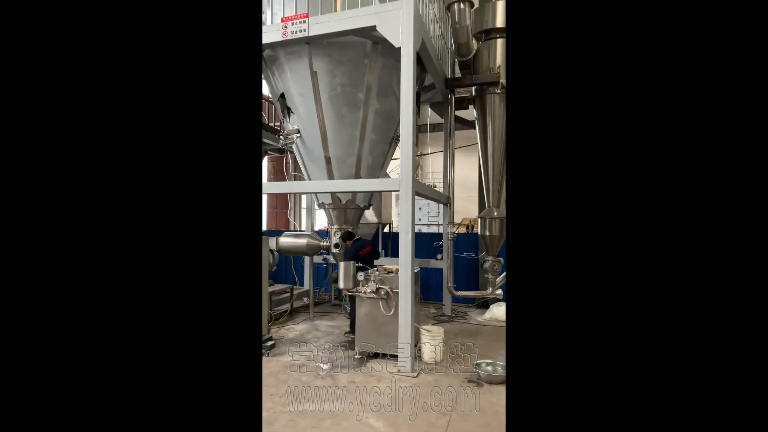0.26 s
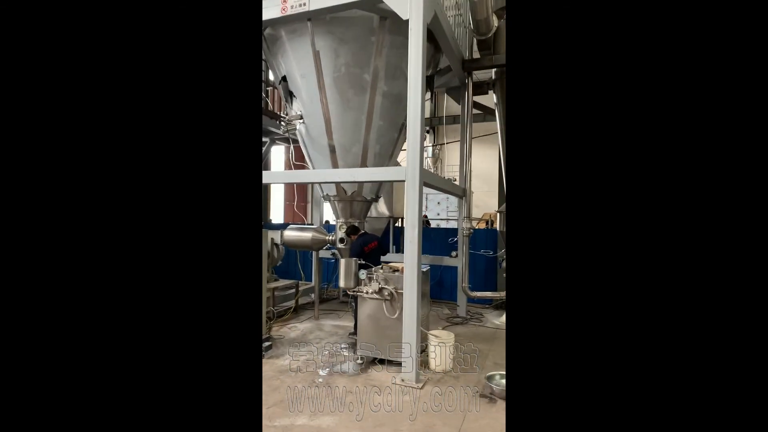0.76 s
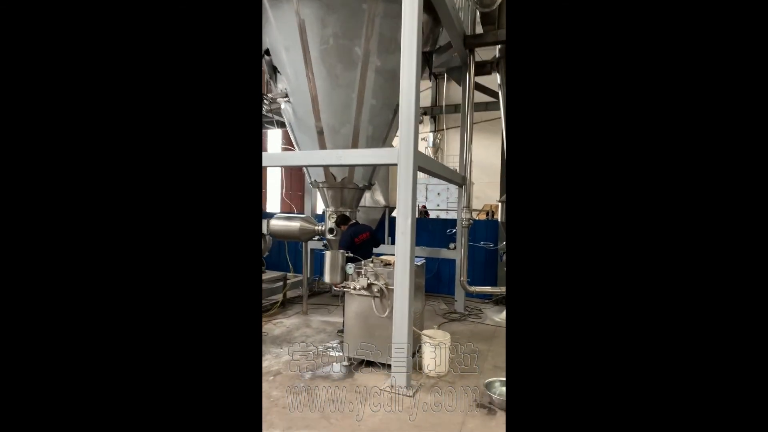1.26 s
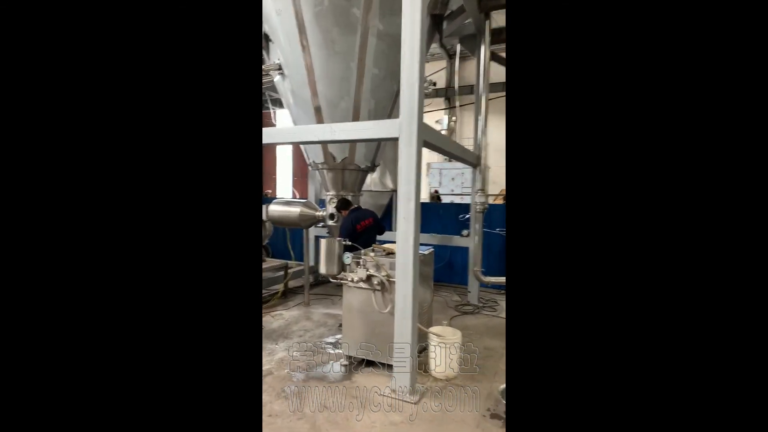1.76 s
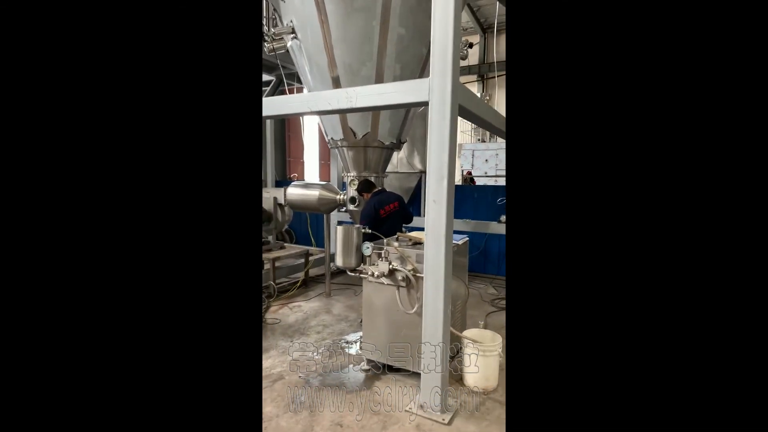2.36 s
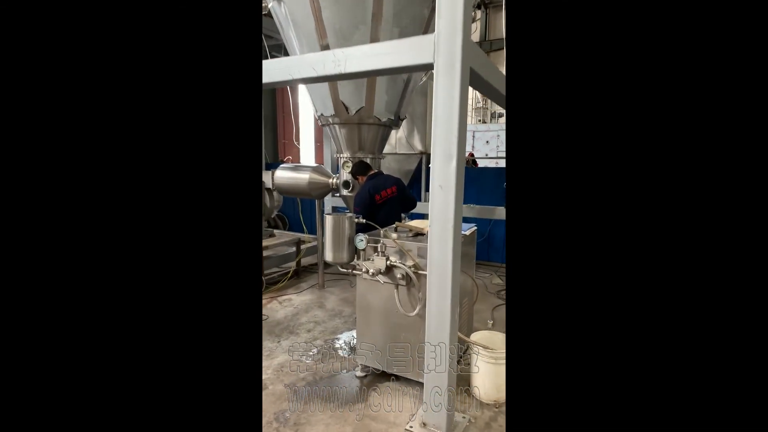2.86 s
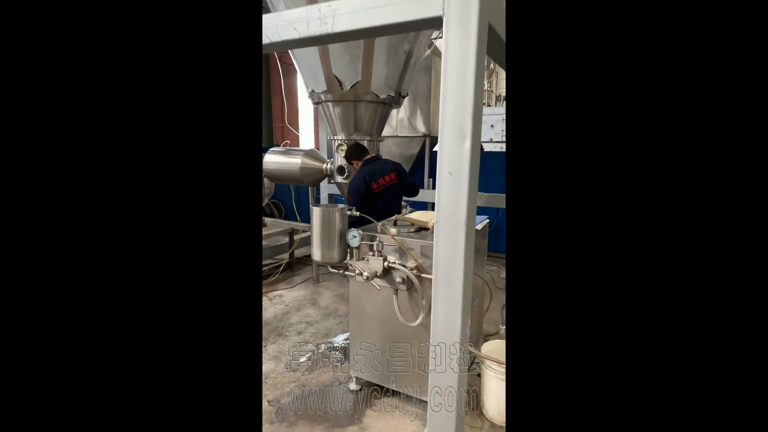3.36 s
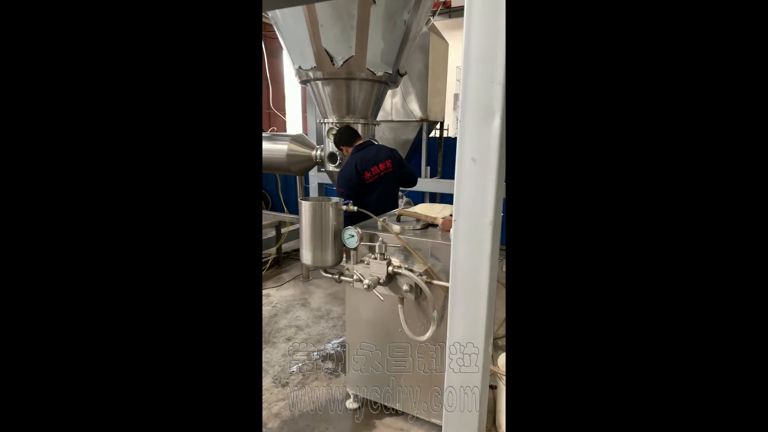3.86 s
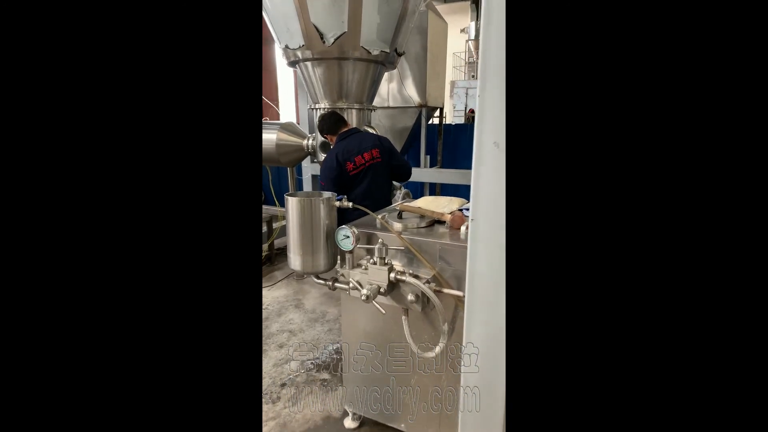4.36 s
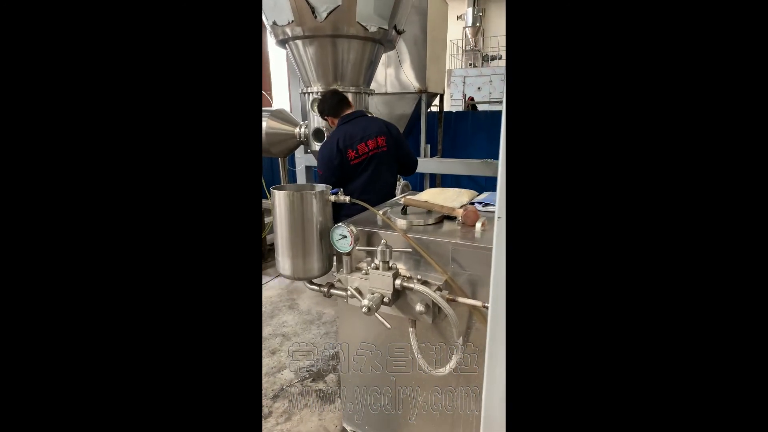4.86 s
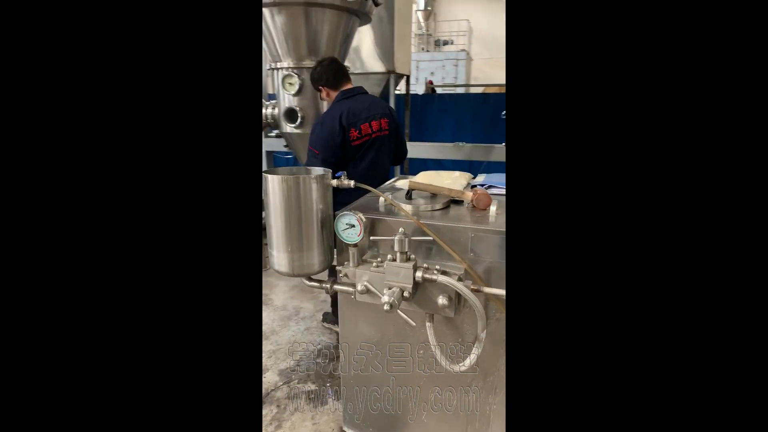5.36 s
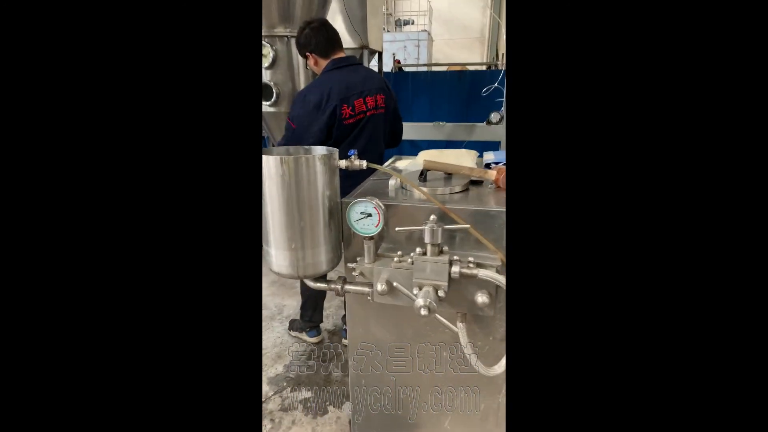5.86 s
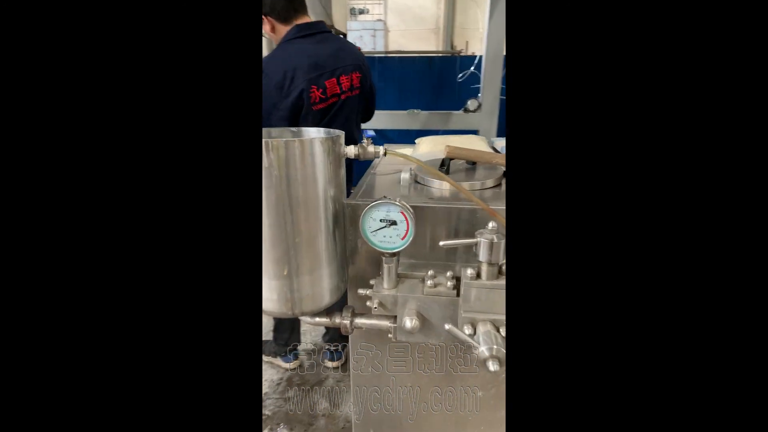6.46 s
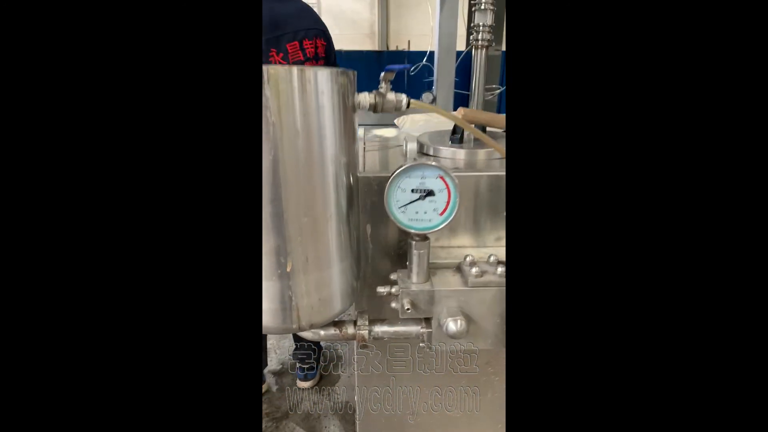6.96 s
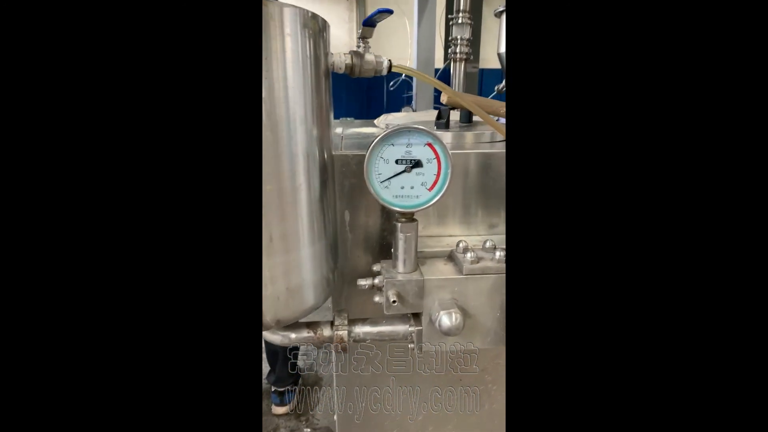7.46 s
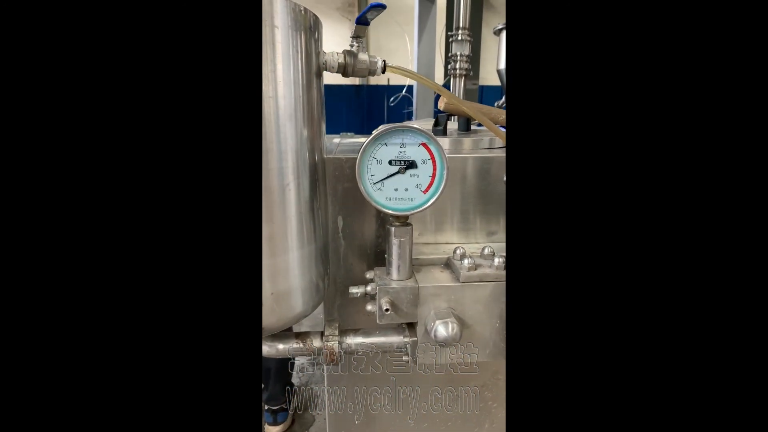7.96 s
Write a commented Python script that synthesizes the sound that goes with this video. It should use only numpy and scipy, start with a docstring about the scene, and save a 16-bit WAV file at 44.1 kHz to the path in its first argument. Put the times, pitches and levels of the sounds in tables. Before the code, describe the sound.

A phone carried toward machinery captures continuous rumble, broadband air rush and beating electrical whine. A thin air leak builds, then one hard metallic bang with sheet-steel clatter overloads the microphone and rings through the hall. Compressed air blasts out and dies away with a tiny squeak and rising whistle, then a dull double knock. The drone returns gradually, the whine getting nearer, with sparse sharp ticks, more frequent in the last three seconds.

```python
"""A spray dryer drones in a factory hall: filtered noise for fans, ducts and nozzle; beating tones for the motor.
A charged air line leaks thinly and small ticks (short noise rings) recur. At 1.86 s a pneumatic hammer strikes
the steel hopper (decaying modes and clatter), vents a noise blast from 2.06 s, squeaks, whistles, and drops back
near 3 s. The phone's limiter ducks the drone under the blow; the hall's echo swells as it lets go.
The drone regains its full level only seconds later, and the motor whine grows as one walks up to it."""
import sys
import numpy as np
from scipy import signal
from scipy.fft import rfft, irfft, next_fast_len
from scipy.io import wavfile
from scipy.ndimage import uniform_filter1d, minimum_filter1d

SR = 44100
rng = np.random.default_rng(int(sys.argv[2]) if len(sys.argv) > 2 else 0)


def unload_audio(sound):
    """Save the sound as a 16-bit wav file, at the path given as the first command line argument."""
    columns = np.transpose(np.atleast_2d(sound))
    # keep every value between -1 and 1, then stretch to whole-number steps
    steps = np.round(np.clip(columns, -1, 1) * 32767)
    wavfile.write(sys.argv[1], SR, steps.astype(np.int16))


N = 362502
TIME = np.arange(N) / SR
FREQ = np.fft.rfftfreq(2 * next_fast_len(N // 2 + 1), 1 / SR)

# hopper modes: (frequency [Hz], level if anvil is struck [dB], level if seat is struck [dB], t60 [s])
HOPPER_MODES = [(332.2, -11.5, 2.5, 0.19), (390, 2.5, -1, 0.048), (470, -2, 0.5, 0.058),
                (551, -32.5, -25, 2.3), (655, -9, -0.5, 0.1), (748, -25, -21, 0.86),
                (811, -1.5, -19, 0.096), (850, -19.5, -31, 0.66), (1032, -14.5, -17, 0.66),
                (1194, -8, -30, 0.17), (1274, -17, -20, 0.32), (1324, -5, -31, 0.14),
                (1473, -15, -14, 0.18), (1488, -20, -20, 0.4), (1620, -22, -27, 0.3),
                (1683, -20, -25, 0.32), (1750, -26, -19, 0.3), (2124, -24, -33, 0.43),
                (2506, -15, -26, 0.15), (2750, -25, -35, 0.18)]
# sheet-steel clatter spectrum: (frequency [Hz], relative density [dB/Hz])
CLATTER_SPECTRUM = [(60, -34), (200, 1), (370, 10), (600, -12.5), (1400, -2.5), (2600, -4), (4200, -9.5),
                    (5300, -6.5), (6400, -3), (8000, -12.5), (11200, 1), (12500, -14), (16000, -23)]
# strike, jolt loose, drop back, bounce: (time [s], ring [dB], clatter [dB], clatter t60 [s],
# contact low-pass corner [Hz], place struck [0 anvil - 1 seat])
BLOWS = [(1.857, 8.5, 5, 0.13, 23700, 0.041), (2.09, -19, -8, 0.49, 2600, 0.3),
         (2.983, -12.5, -12, 0.17, 1700, 1), (3.056, -28, -21, 0.12, 2000, 1)]
# air let out of the hammer: (time [s], level [dB], rise [s], t60 [s], low edge [Hz], high edge [Hz])
VENTS = [(1.822, -12, 0.0044, 0.042, 8000, 14000), (1.843, -7, 0.012, .04, 2200, 3600),
         (2.057, 6.5, 0.01, 0.18, 9500, 22000), (2.074, 8, 0.0167, 0.27, 282, 22000),
         (2.83, -13.5, 0.015, 0.37, 4800, 22000)]
# vented-air spectrum before band limits: (frequency [Hz], relative density [dB/Hz])
VENT_SPECTRUM = [(60, 23.5), (200, 14), (500, 6), (1400, 4.5), (2800, -0.2), (4500, -1), (7000, -2.5),
                 (11000, -2), (16000, -6)]
# whistle of the emptying air line: (time [s], frequency [Hz], level [dB])
WHISTLE_TRACK = [(2.36, 1074, -49), (2.47, 1087, -33), (2.8, 1114, -36), (2.88, 1122, -50)]
# low moan of the emptying air line: (time [s], frequency [Hz], level [dB])
MOAN_TRACK = [(2.55, 221.3, -50), (2.73, 234, -32.5), (2.86, 250, -53), (2.98, 251, -43)]
# valve squeak as the pressure falls: (time [s], level [dB])
SQUEAK_LEVEL = [(2.38, -76), (2.43, -39), (2.48, -24), (2.56, -79)]
# squeak partials: (frequency [Hz], relative level [dB])
SQUEAK_PARTIALS = [(4660, -17), (9320, -9), (11650, -14), (13980, -14)]

# inverter switching tones and sidebands, each with one swell or dip:
# (frequency [Hz], relative level [dB], swell time [s], swell gain [dB], half width [s])
SWITCHING_TONES = [(5636, -14, 7.5, 2, 1), (5733, -9, 4.6, 4, 0.7), (5883, 1, 4, 2.5, 1),
                   (5977, 0, 6.4, 3, 1.2), (6025, 1, 0.25, 8, 0.3), (6078, -7, 4.5, -3, 1.5),
                   (6125, -1.5, 7.9, 4, 0.7), (6175, -6, 8, 2, 0.5), (6272, -14, 5.5, 4, 0.9),
                   (6320, -14, 6, 3, 1), (6465, -10, 6.1, 4.5, 1.2), (9946, -26, 7.6, 11, 1.2),
                   (11854, -21, 7.8, 5, 1)]
# motor casing rung by the switching: (frequency [Hz], relative density [dB/Hz])
CASING_SPECTRUM = [(5000, -17.5), (5700, 4), (6030, 3), (6350, 3), (7200, -11.5), (9600, -61), (9930, -1),
                   (10300, -36), (11500, -30), (11900, -9), (12500, -41)]
# whine swells: (time [s], gain [dB], half width [s])
WHINE_SWELLS = [(.15, -2, 0.2), (2.7, -2, 0.69), (3.5, 1.5, 0.22), (5.4, 2.5, 0.22), (7.08, -2.5, 0.09),
                (7.3, 3, 0.1), (7.63, -2, .17)]
# far from the motor its tones sink into the casing ring: (time [s], gain [dB], half width [s])
TONE_DIPS = [(1.0, -1, 1.4)]
CASING_SWELLS = [(0.9, 2.5, 1.2)]
STRIDE_S, STRIDE_CREST_S, STRIDE_DB, WALK_ENDS_S = 0.827, 4.57, 1.3, 6.47

# steady noise spectra of fans, ducts, nozzle: (frequency [Hz], relative density [dB/Hz])
RUMBLE_SPECTRUM = [(20, -27), (36, -18), (52, -3.5), (72, 3.5), (120, 0.5), (145, -5), (170, 0), (235, -2),
                   (320, -2), (350, -5), (440, -5.5), (500, -19), (800, -58)]
DUCT_SPECTRUM = [(250, -7), (480, 3), (660, 2), (850, 0.5), (1050, 0), (1500, -4.5), (2050, -5),
                 (2500, -10), (2900, -6.5), (3700, -6), (5000, -15.5), (8000, -12.5), (16000, -136)]
NOZZLE_SPECTRUM = [(2000, -20), (3000, 4), (5100, -1.5), (5700, 14), (6500, 11.5), (7500, -13), (9300, -6),
                   (11000, 3.5), (11600, 0.5), (12100, 9), (12700, -2), (14500, -1.5), (15600, -0.5)]
# shaft and casing hums: (frequency [Hz], level re rumble [dB])
HUMS = [(70, -14), (124, -11.5), (161, -13), (301.5, -10.5), (372, -11.5), (647, -20.5), (662, -18.5),
        (684, -23)]
# swells and dips of fans and ducts: (time [s], gain [dB], half width [s])
RUMBLE_SWELLS = [(.3, 0, 0.26), (7.15, -1.1, 0.29), (7.92, 2.5, 0.052)]
LOWER_FAN_SWELLS = [(1.6, 9, 0.33), (3.3, -20, 0.18), (5, 7, 0.73), (7.7, 9, 0.48)]
UPPER_FAN_SWELLS = [(.35, 6.1, 0.11), (1.5, 11.3, 0.16)]
DUCT_SWELLS = [(.15, -1, 0.13), (7.2, -2, 0.13), (7.8, 1.5, 0.15)]
LOWER_FAN_HZ, UPPER_FAN_HZ = 390.7, 421.4

# leak of the charged air line until the hammer fires: (time [s], level [dB])
LEAK_LEVEL = [(0, -54), (1.0, -38), (1.84, -40.5), (1.9, -90)]
# leak spectrum: (frequency [Hz], relative density [dB/Hz])
LEAK_SPECTRUM = [(1800, 1.5), (3600, 7.5), (4800, -5), (6050, 4), (7200, -7), (11600, -33), (12130, 4),
                 (12500, -12), (15300, -12), (15700, 6), (16000, -10)]
# small ticks: (time [s], level [dB], ring frequency [Hz])
TICKS = [(0.329, -35, 9850), (1.699, -33, 10000), (2.984, -28, 10500), (4.4344, -35, 9950),
         (5.127, -24.5, 9800), (5.8153, -27, 10500), (6.0332, -34, 11200), (6.2622, -35, 12000),
         (6.3784, -35, 11800), (6.5026, -25.5, 11600), (6.7221, -29, 11400), (6.9491, -37, 11400),
         (7.0678, -35, 9850), (7.193, -17, 10700), (7.4135, -31, 11800), (7.637, -32, 11100),
         (7.88, -22, 9700)]
# hall decay: (frequency [Hz], t60 [s])
HALL_DECAY = [(60, 9.8), (250, 1.9), (1000, 2.13), (2000, 1.82), (4000, 1.38), (8000, 0.7), (16000, 0.041)]
# microphone ports: (frequency [Hz], left lead [rad], diffuse share [dB], left minus right [dB])
PORTS = [(90, .03, -36, 0), (200, .2, -24, 0), (390, .48, -15, -1.1), (750, .5, -12, -1.3),
         (1550, .42, -12, -.3), (2500, 1.75, -7, -.3), (3500, 1.6, -10, 0), (4750, 3.14, -21, 0),
         (6000, 4.95, -14, 0), (6900, 6.28, -14, 0), (8900, 9.42, -21, 0), (11050, 12.57, -12, 0),
         (13100, 15.71, -22, 0), (15200, 18.85, -13, 0)]
TOP_HZ = 15750


def undb(db):
    """Decibels to gain."""
    return 10 ** (np.asarray(db) / 20)


def unit(x):
    """Scale to rms 1."""
    return x / np.sqrt(np.mean(x ** 2))


def over_time(rows):
    """Columns of a time table, interpolated at every sample."""
    time_s, *columns = np.transpose(rows)
    return [np.interp(TIME, time_s, c) for c in columns]


def over_freq(rows):
    """Columns of a frequency table, interpolated over log frequency."""
    hz, *columns = np.transpose(rows)
    return [np.interp(np.log(FREQ + 1), np.log(hz), c) for c in columns]


def shape(x, gain):
    """Filter by a gain per frequency bin."""
    return irfft(rfft(x, 2 * (len(FREQ) - 1)) * gain)[:N]


def noise(spectrum):
    """Coloured noise, rms 1."""
    return unit(shape(rng.standard_normal(N), undb(over_freq(spectrum)[0])))


def drift(rate_hz):
    """Random low-pass modulation without DC, rms 1."""
    return unit(shape(rng.standard_normal(N), np.exp(-(FREQ / rate_hz) ** 2) * (FREQ > 0)))


def grain(depth_db, rate_hz):
    """Quick, uneven flutter of strength, rms 1."""
    return unit(undb(depth_db * drift(rate_hz)))


def fade(start_s, t60_s, rise_s):
    """Linear rise, then exponential decay."""
    envelope = np.zeros(N)
    sounding = slice(int(start_s * SR), int((start_s + rise_s + 2 * t60_s) * SR))
    age_s = TIME[sounding] - start_s
    decay = np.exp(-np.log(1000) * np.maximum(age_s - rise_s, 0) / t60_s)
    envelope[sounding] = np.clip(age_s / rise_s, 0, 1) * decay
    return envelope


def tone(hz, scatter, rate_hz):
    """Held tone plus randomly changing reflections that add and cancel, rms 1."""
    knots_s = np.arange(0, N / SR + 1, 1 / rate_hz)
    echo = rng.standard_normal((800, 2))[:len(knots_s)]
    angle = 2 * np.pi * (np.cumsum(hz * np.ones(N)) / SR + rng.random())
    in_phase, quadrature = (scatter * np.interp(TIME, knots_s, part) for part in echo.T)
    return unit((1 + in_phase) * np.cos(angle) + quadrature * np.sin(angle))


def along_walk(start_db, db_per_s, swells=()):
    """Level of a steady source [dB]: linear drift plus bell-shaped swells."""
    bells_db = sum(db * np.exp(-((TIME - s) / width_s) ** 2) for s, db, width_s in swells)
    return start_db + db_per_s * TIME + bells_db


def hammer(spread_s=0.0084, clatter_rise_s=0.006):
    """Blows ring hopper modes and clatter; the place struck sets the mode levels."""
    out, age_s = np.zeros(N), TIME[:int(2 * SR)]
    for start_s, ring_db, clatter_db, clatter_t60_s, corner_hz, seat in BLOWS:
        ring = np.zeros(len(age_s))
        for hz, anvil_db, seat_db, t60_s in HOPPER_MODES:
            mode_db = anvil_db + seat * (seat_db - anvil_db) - 60 * age_s / t60_s
            ring += undb(mode_db) * np.sin(2 * np.pi * (hz * age_s + rng.random()))
        first = int(start_s * SR)
        # the blow takes milliseconds to spread over the shell
        out[first:first + len(age_s)] += undb(ring_db) * ring * np.minimum(age_s / spread_s, 1)
        contact = 1 / np.hypot(1, (FREQ / corner_hz) ** 2)
        clatter = shape(noise(CLATTER_SPECTRUM), contact) * grain(depth_db=2.5, rate_hz=180)
        out += undb(clatter_db) * clatter * fade(start_s, clatter_t60_s, clatter_rise_s)
    return out


def vents():
    """The valve spits as it opens, then dumps air as rough band-limited noise."""
    out = np.zeros(N)
    for start_s, db, rise_s, t60_s, low_hz, high_hz in VENTS:
        band = FREQ ** 2 / (FREQ ** 2 + low_hz ** 2) / np.hypot(1, (FREQ / high_hz) ** 2)
        air = shape(noise(VENT_SPECTRUM), band) * grain(depth_db=2.0, rate_hz=195)
        out += undb(db) * fade(start_s, t60_s, rise_s) * air
    return out


def whistle(track, waver, flutter_db):
    """Air-driven rising tone of the emptying line, wavering in pitch and strength."""
    hz, db = over_time(track)
    angle = 2 * np.pi * np.cumsum(hz * (1 + waver * drift(29.0))) / SR
    blowing = (TIME > track[0][0]) & (TIME < track[-1][0])
    return blowing * undb(db + flutter_db * drift(15)) * unit(np.sin(angle))


def squeak():
    """Short valve squeak: partials sharing one wavering pitch."""
    db, = over_time(SQUEAK_LEVEL)
    clock_s = np.cumsum(1 + 0.0027 * drift(60)) / SR
    partials = sum(undb(tone_db) * np.sin(2 * np.pi * hz * clock_s) for hz, tone_db in SQUEAK_PARTIALS)
    sounding = db > SQUEAK_LEVEL[0][1] + 3
    return undb(db + 1.5 * drift(40)) * sounding * partials


def motor():
    """Switching tones beat over casing-ring noise; walking sways level and doubles pitch wander."""
    walking = np.clip((WALK_ENDS_S - TIME) / 0.1, 0, 1)
    sway_db = STRIDE_DB * np.cos(2 * np.pi * (TIME - STRIDE_CREST_S) / STRIDE_S) * walking
    whine_db = along_walk(-44, 0.88, WHINE_SWELLS) + sway_db
    doppler = 1 + 0.00033 * (1 + walking) * drift(3.0)
    tones = np.zeros(N)
    for hz, db, swell_s, swell_db, width_s in SWITCHING_TONES:
        level_db = along_walk(db, 0, [(swell_s, swell_db, width_s)])
        fading = undb(0.5 * drift(1.06))
        tones += undb(level_db) * unit(fading * tone(hz * doppler, scatter=0.68, rate_hz=12))
    tones *= undb(along_walk(-3.5, 0, TONE_DIPS))
    casing = undb(along_walk(-4.5, 0, CASING_SWELLS)) * noise(CASING_SPECTRUM)
    return undb(whine_db) * (tones + casing)


def fans():
    """Fan rumble noise with shaft and casing hums, plus two blade tones."""
    hums = sum(undb(db) * tone(hz, scatter=1.17, rate_hz=8) for hz, db in HUMS)
    rumble = undb(0.81 * drift(1.6)) * noise(RUMBLE_SPECTRUM)
    lower = undb(along_walk(-46.5, 0.74, LOWER_FAN_SWELLS)) * tone(LOWER_FAN_HZ, scatter=2.2, rate_hz=34)
    upper = undb(along_walk(-45, 0.3, UPPER_FAN_SWELLS)) * tone(UPPER_FAN_HZ, scatter=0.85, rate_hz=12)
    return undb(along_walk(-32.5, -0.058, RUMBLE_SWELLS)) * (rumble + hums) + lower + upper


def ducts():
    """Air rush: coloured noise with fluttering level."""
    return undb(along_walk(-35.5, 0.0043, DUCT_SWELLS) + 1.09 * drift(22.0)) * noise(DUCT_SPECTRUM)


def nozzle():
    """Nozzle hiss: high coloured noise with fluttering level."""
    return undb(along_walk(-40, -0.018) + 1.14 * drift(39)) * noise(NOZZLE_SPECTRUM)


def leak():
    """Thin hiss from the fittings of the charged air line."""
    db, = over_time(LEAK_LEVEL)
    return undb(db + 0.5 * drift(14)) * noise(LEAK_SPECTRUM)


def ticks(width_hz=2200, body_db=-13, tail_db=-11, size=8192):
    """Tiny noise cracks with a short, high ring."""
    out, freq_hz = np.zeros(N), np.fft.rfftfreq(size, 1 / SR)
    for start_s, db, hz in TICKS:
        resonance = 1 / np.hypot(1, 2 * (freq_hz - hz) / width_hz)
        colour = resonance + undb(body_db) * freq_hz / (freq_hz + 3000)
        grit = np.resize(unit(irfft(rfft(rng.standard_normal(size)) * colour)), N)
        crack = fade(start_s, t60_s=0.023, rise_s=0.00025)
        tail = undb(tail_db) * fade(start_s, t60_s=0.045, rise_s=0.011)
        out += undb(db) * grit * (crack + tail)
    return out


def hall(x, wet_db):
    """Diffuse hall echo: octave bands of decaying noise, treble dying first."""
    t60_s, = over_freq(HALL_DECAY)
    octave = np.log2(np.clip(FREQ, 62.5, 16000) / 62.5)
    white, response = rng.standard_normal(N), np.zeros(N)
    for k in range(9):
        band = np.maximum(1 - abs(octave - k), 0)
        band_t60_s = np.average(t60_s, weights=band)
        response += shape(white, band) * fade(0.0012, band_t60_s, rise_s=0.0025)
    return undb(wet_db) * signal.fftconvolve(x, response / np.sqrt(SR))[:N]


def bounced(x, t60_s):
    """Dense spray of reflections through a unit-energy noise response."""
    response = rng.standard_normal(N) * fade(0, t60_s, rise_s=0.0069)
    return signal.fftconvolve(x, response / np.linalg.norm(response))[:N]


def scene():
    """Sum the sources at two microphone ports, the left a little earlier."""
    air_line = whistle(WHISTLE_TRACK, waver=0.0018, flutter_db=0.5)
    air_line += whistle(MOAN_TRACK, waver=0.0507, flutter_db=4.0)
    knocks = hammer() + vents() + air_line + squeak() + ticks()
    field = motor() + fans() + ducts() + nozzle() + leak() + hall(knocks, wet_db=2.5)
    lead_rad, diffuse_db, pan_db = over_freq(PORTS)
    # side reflections off steelwork and walls: opposite sign at the two ports
    diffuse = shape(bounced(knocks, t60_s=0.041) + bounced(field, t60_s=0.081), undb(diffuse_db))
    ports = []
    for side in (1, -1):
        response = undb(side * pan_db / 2) * np.exp(0.5j * side * lead_rad)
        ports.append(shape(knocks + field + side * diffuse, response))
    return np.array(ports)


def recover(room_db, hold_s, release_db_per_s):
    """Gain [dB] that drops at once to the room left, holds, then climbs linearly."""
    half = int(hold_s * SR / 2)
    held_db = minimum_filter1d(room_db, 2 * half + 1, origin=half, mode="nearest")
    climb_db = release_db_per_s * TIME
    return climb_db + np.minimum.accumulate(held_db - climb_db)


def limiter(x, ceiling_db, slow_depth_db):
    """Peaks push the gain down; most returns quickly, the last decibels after seconds."""
    room_db = np.minimum(ceiling_db - 20 * np.log10(abs(x).max(axis=0) + 1e-9), 0)
    fast_db = recover(room_db, hold_s=0.18, release_db_per_s=63)
    slow_db = recover(np.maximum(room_db, slow_depth_db), hold_s=3.3, release_db_per_s=2.5)
    gain_db = minimum_filter1d(np.minimum(fast_db, slow_db), size=200)
    return x * undb(uniform_filter1d(gain_db, size=200))


def record(dry):
    """The phone limits the blow and cuts the top."""
    limited = limiter(dry, ceiling_db=-0.3, slow_depth_db=-6.5)
    low_pass = signal.ellip(10, 0.1, 60, TOP_HZ, fs=SR, output="sos")
    return signal.sosfiltfilt(low_pass, limited)


dry = scene()
out = record(dry)
unload_audio(out)
```